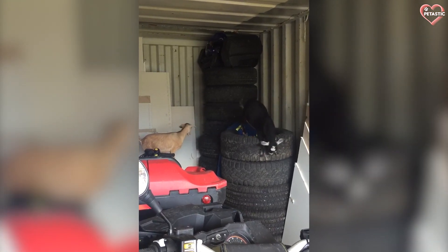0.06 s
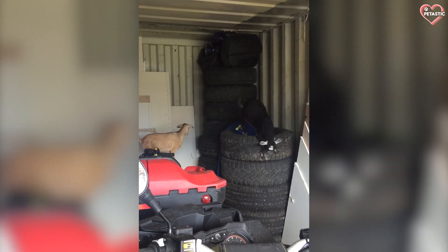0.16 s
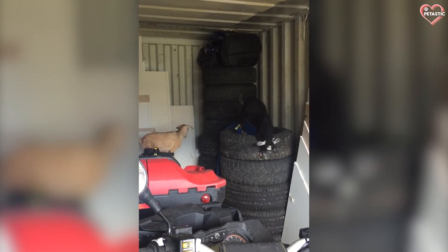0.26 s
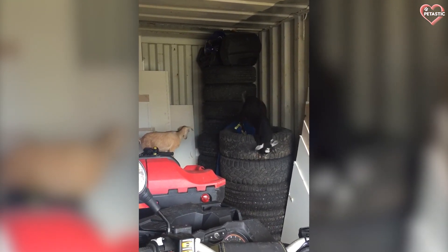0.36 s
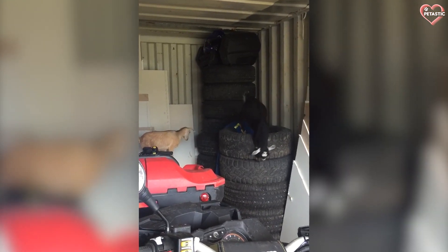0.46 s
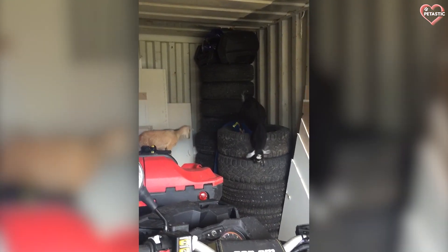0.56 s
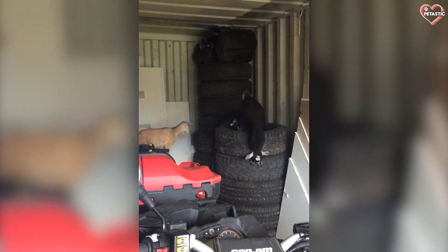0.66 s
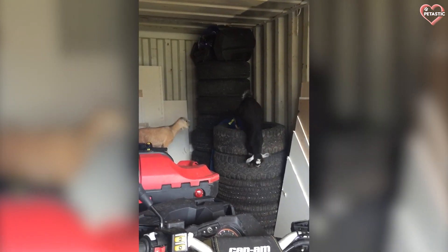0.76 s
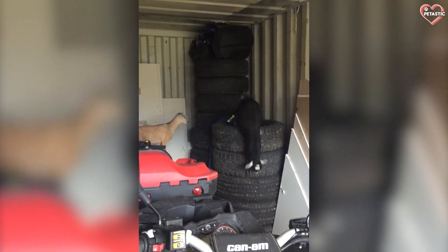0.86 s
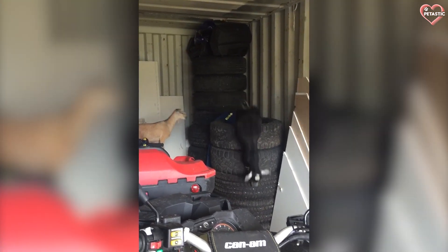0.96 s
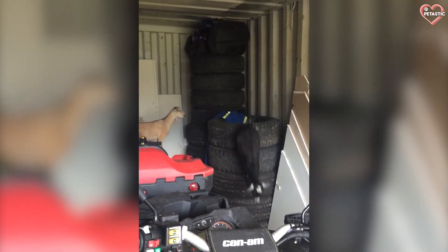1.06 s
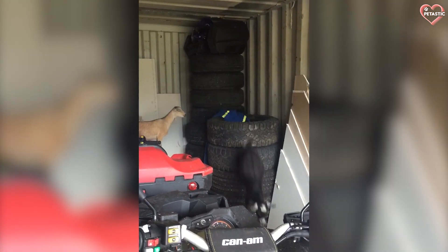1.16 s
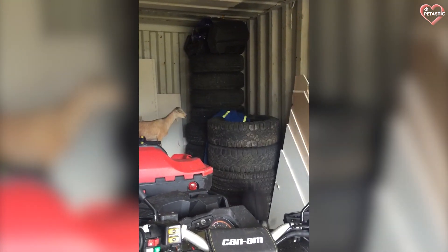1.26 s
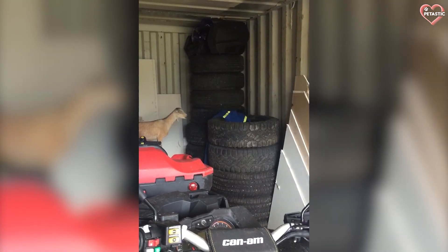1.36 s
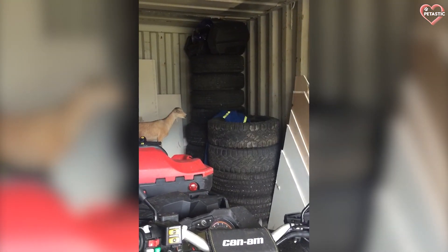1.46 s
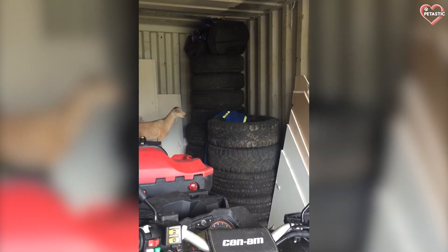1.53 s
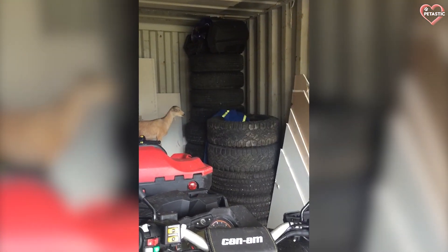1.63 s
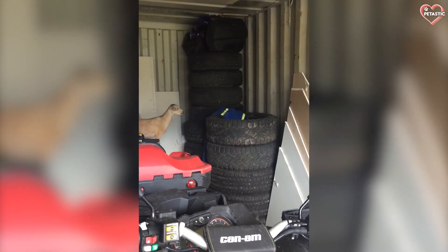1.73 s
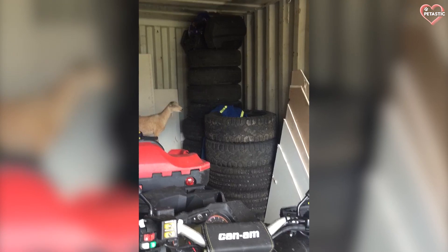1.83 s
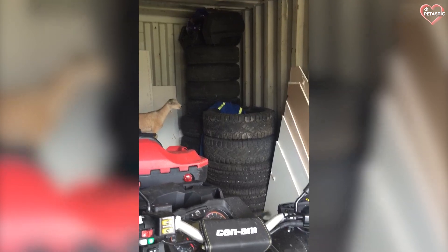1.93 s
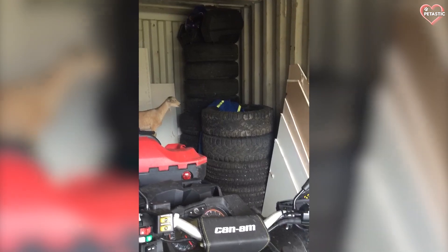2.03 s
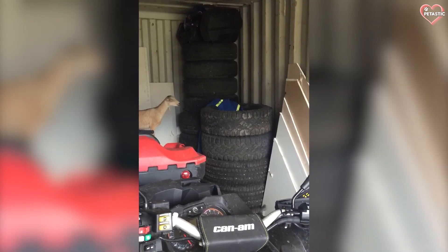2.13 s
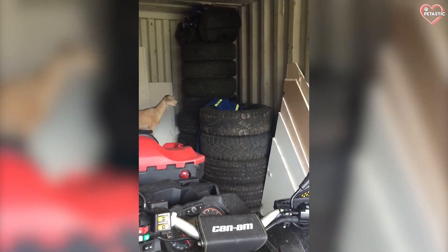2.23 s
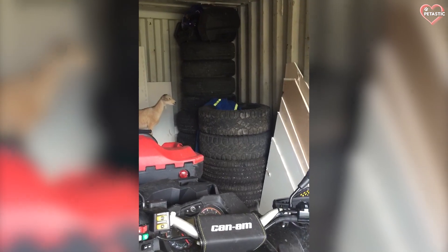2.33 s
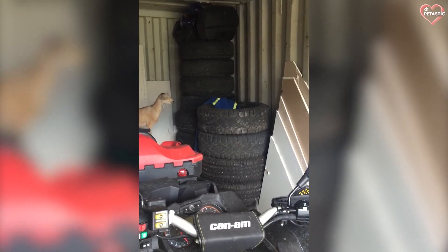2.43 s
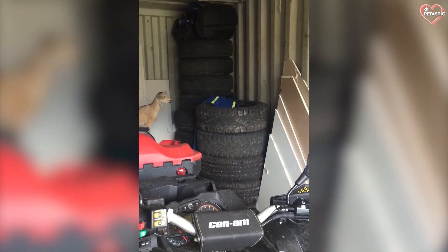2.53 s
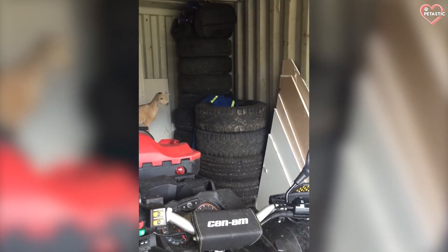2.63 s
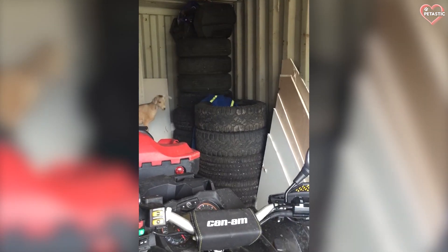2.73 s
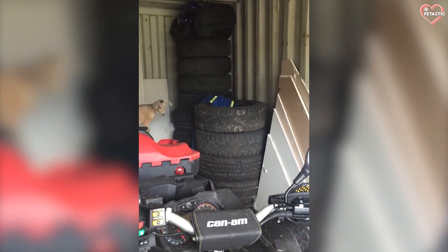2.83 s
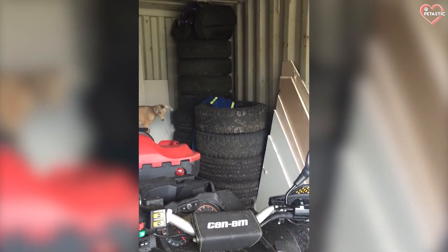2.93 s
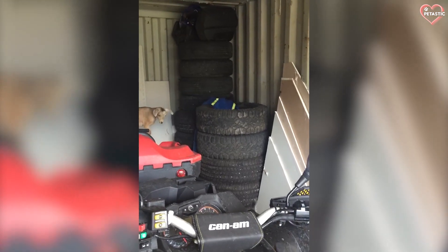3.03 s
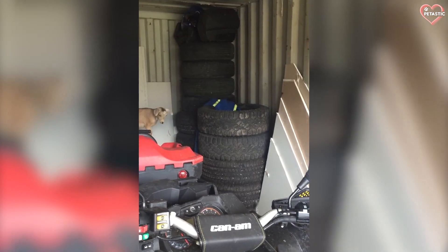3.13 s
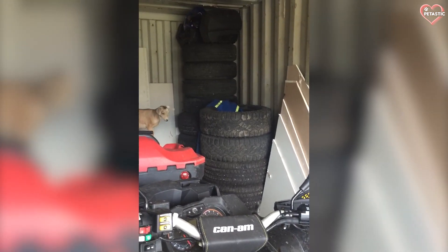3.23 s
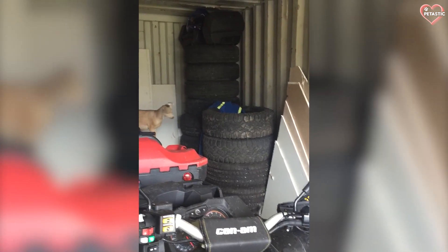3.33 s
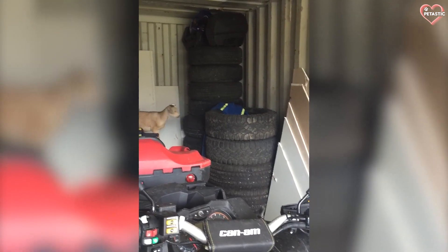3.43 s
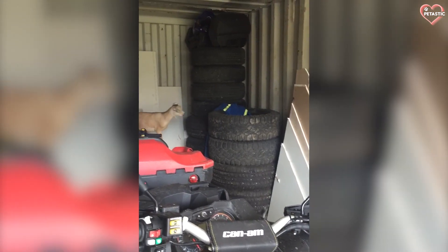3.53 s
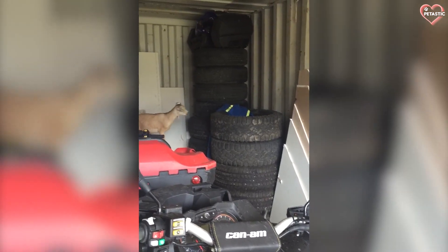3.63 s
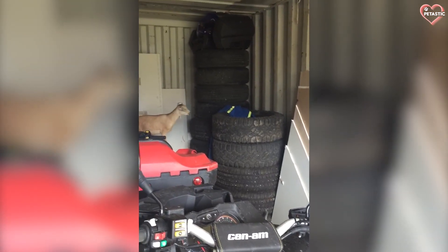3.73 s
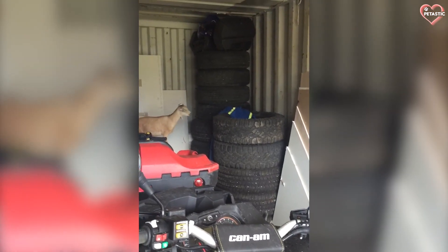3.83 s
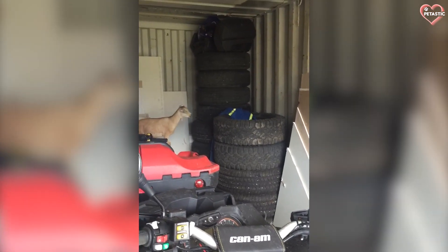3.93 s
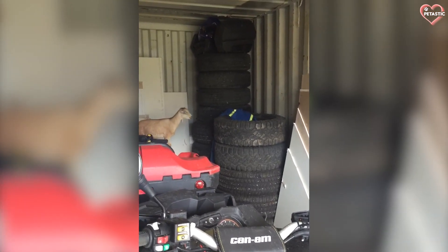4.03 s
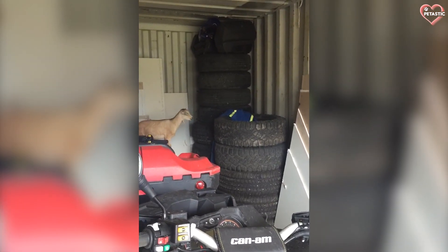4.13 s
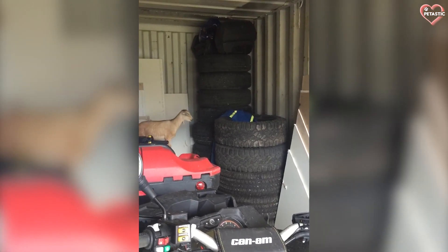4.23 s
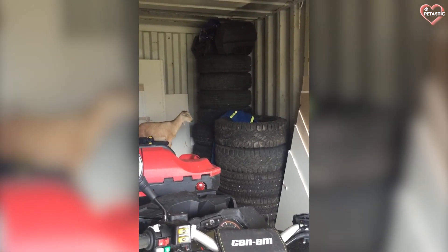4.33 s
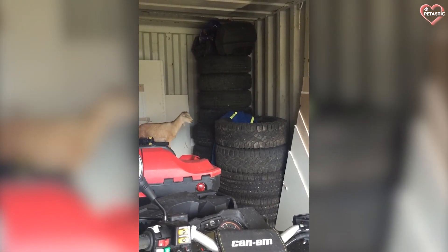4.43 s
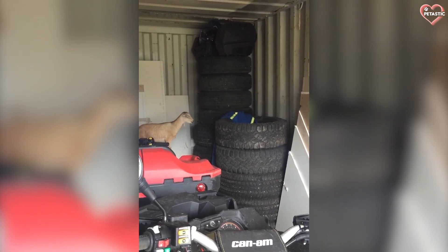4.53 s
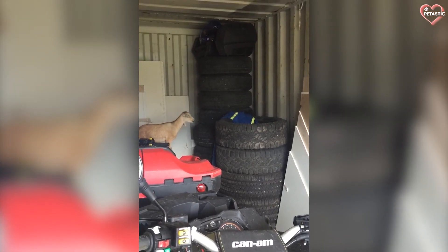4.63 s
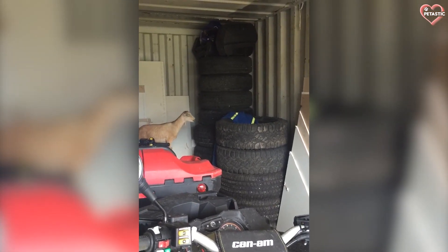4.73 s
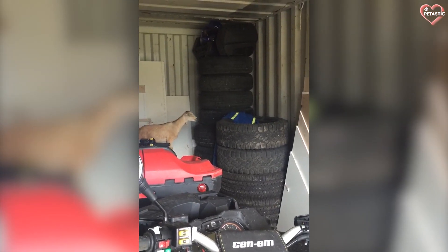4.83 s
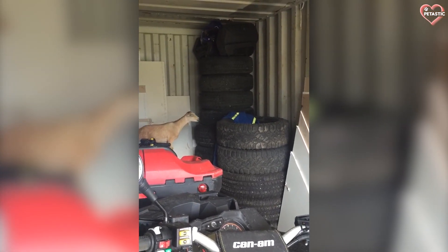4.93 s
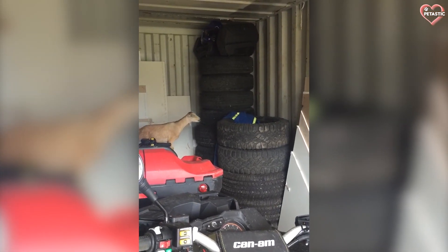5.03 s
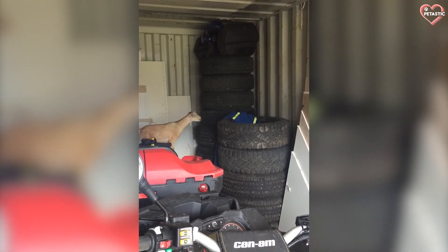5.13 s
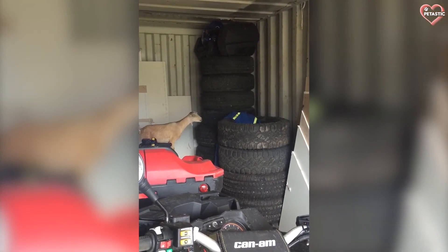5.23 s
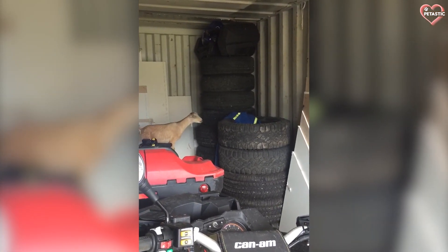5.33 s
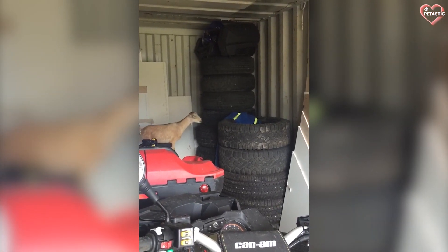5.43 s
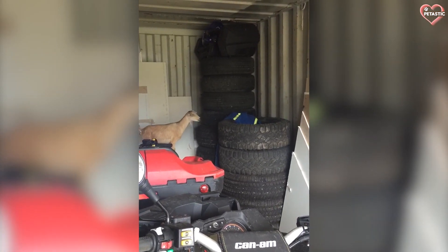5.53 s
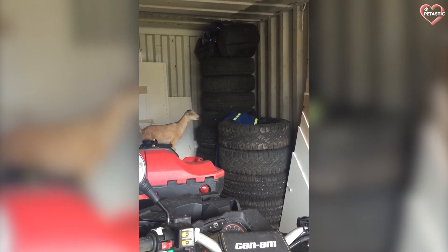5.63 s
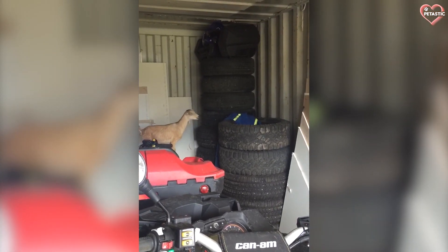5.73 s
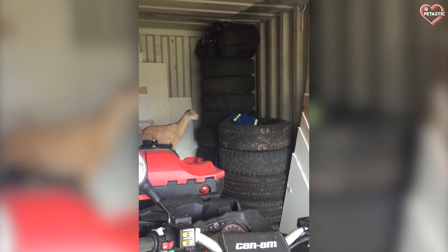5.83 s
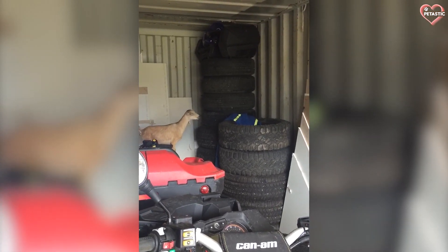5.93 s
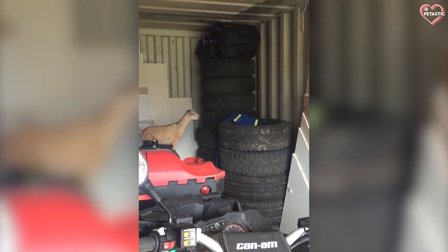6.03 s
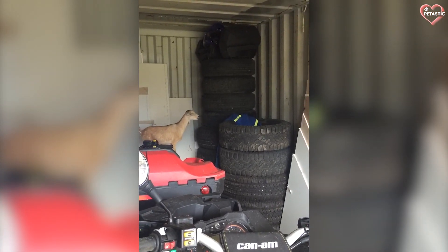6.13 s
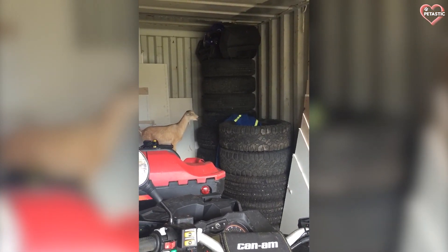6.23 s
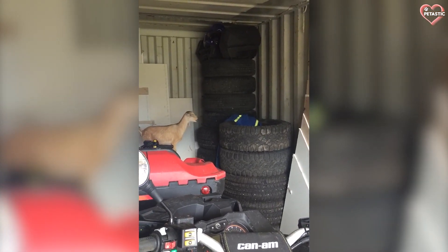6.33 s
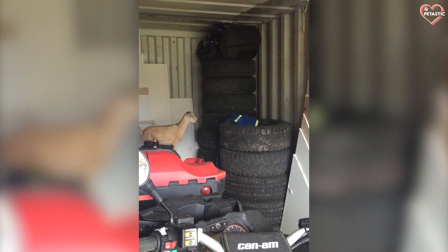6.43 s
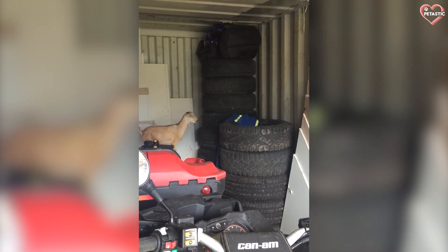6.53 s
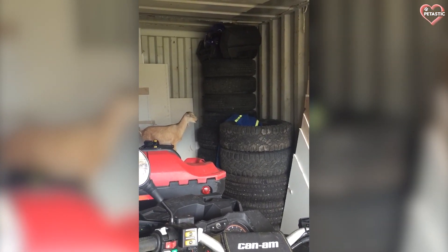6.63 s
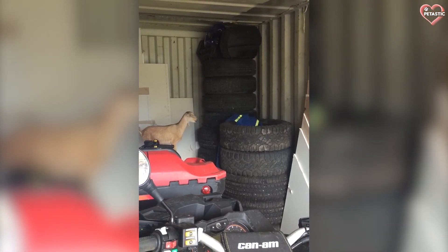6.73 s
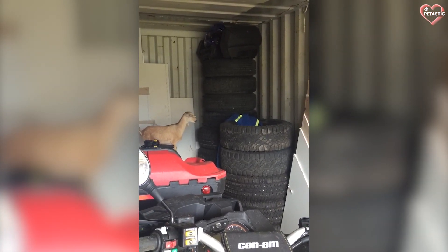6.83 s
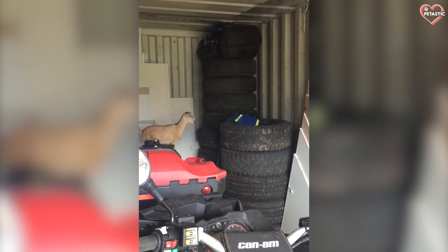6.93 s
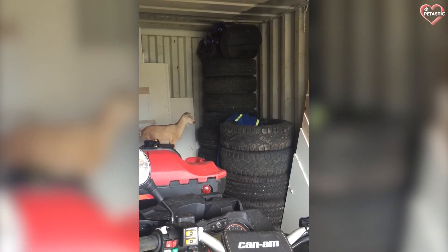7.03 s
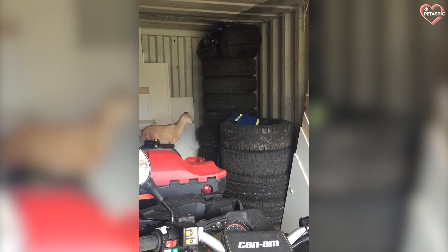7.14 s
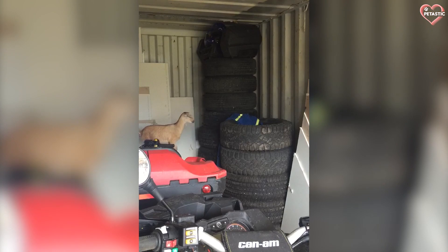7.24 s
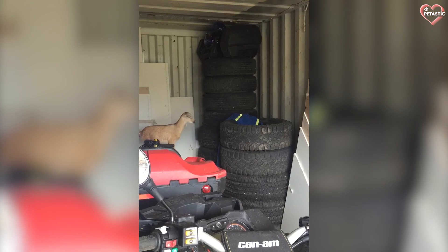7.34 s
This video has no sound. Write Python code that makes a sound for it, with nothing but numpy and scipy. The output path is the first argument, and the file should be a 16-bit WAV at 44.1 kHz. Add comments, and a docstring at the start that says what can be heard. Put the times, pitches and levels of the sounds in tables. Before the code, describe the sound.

A goat jumps off stacked tyres and lands with a loud hollow double thud, metal walls ringing, then single hoof taps.

```python
"""Hooves sound on the floor and load of a steel storage container as goats move about: bursts of noise echoes
with two narrow resonances. One goat shifts on a stack of tyres, whose air column sounds a wobbling low tone,
then jumps down with a double thud. The thud excites damped modes of walls and floor, a noise shimmer in the
thin panels and a small metal rattle; single knocks follow. Shaped noise gives a low rumble and a faint hiss."""
import sys
import numpy as np
from scipy import signal
from scipy.io import wavfile

SR = 44100
rng = np.random.default_rng(int(sys.argv[2]) if len(sys.argv) > 2 else 0)


def transcribe(signal):
    """Save signal, clipped to [-1, 1], as a 16-bit WAV file at the path in sys.argv[1]."""
    frames = np.atleast_2d(signal).T
    limited = np.clip(frames, -1, 1)
    pcm = np.round(limited * 32767).astype(np.int16)
    wavfile.write(sys.argv[1], SR, pcm)


N = 325445

# Third-octave band edges and geometric centres, f/Hz
EDGES = 24 * 2 ** np.arange(0, 9.5, 1 / 3)
CENTRES = np.sqrt(EDGES[1:] * EDGES[:-1])

# Spectrum of the hiss: f/Hz, density level/dB (per Hz, relative)
HISS_SPECTRUM = [(18, -32), (30, -4.5), (81, -4.5), (177, -7.5), (307, -6), (479, -11.5), (1080, -11.5),
                 (4900, -21.5), (5890, -22.5), (10500, -28), (12200, -31), (14300, -28.5), (15500, -42)]
HISS_DB = -70
# Level of the low rumble as tyres and floor flex under the animals' weight: t/s, level/dB
RUMBLE_LEVEL = [(0.0, -70), (0.35, -75), (0.82, -58), (1.09, -45), (1.21, -60), (1.46, -48.5), (1.58, -42),
                (2.6, -60.5), (2.9, -70.5), (3.05, -65), (4.2, -70), (4.4, -66.5), (4.93, -74),
                (5.73, -69.5), (6.7, -75), (7.38, -78.5)]
# Spectrum of the rumble: f/Hz, density level/dB (per Hz, relative)
RUMBLE_SPECTRUM = [(13, -38), (22, -5), (43, 7), (91, 5), (124, -6.5), (162, -17), (200, -18), (260, -59.5),
                   (440, -120)]

# Blows of a loose metal part after the jump: t/s, level/dB
RATTLE_BLOWS = [(1.913, -67), (1.921, -70.5), (1.955, -71.5)]
# Modes of that part: f/Hz, level/dB, nominal t60/s
RATTLE_MODES = [(1630, 7, 0.14), (2720, 0.5, 0.11), (5400, -7, 0.08), (6470, -6.5, 0.0516)]
# Blows that shake the walls: t/s, level/dB
WALL_BLOWS = [(1.392, -27), (1.446, -29)]
# Modes of the corrugated walls and floor: f/Hz, level/dB, nominal t60/s
WALL_MODES = [(37.6, -22.5, 4.2), (46.14, -26, 3.5), (58.865, -18, 3.8), (64, -15.5, 2.2), (79, 6, 0.45),
              (83, -12.5, 3.5), (102.6, -14.5, 2), (108.57, -18.5, 2), (220.5, -26, 1.8),
              (242.04, -17, 2.8), (235.1, -13, 2.337), (268.4, -11, 1.7), (301.9, -8, 3.2),
              (299.4, -9.5, 1.838), (319.5, -2, 1.723), (336.6, -14.5, 4), (348, -7.5, 2.5), (364, -8, 1.7),
              (405.1, -12, 1.7), (417.6, -0.5, 0.79), (432, -12, 1.444), (537, -7.5, 1.176),
              (593.1, -25, 1.198), (628, -15, 1.5), (700, -10, 1.3), (662, -17, 0.84), (750.6, -10, 0.3),
              (993, -19.5, 1.5), (1220, -21.5, 0.61), (1410, -23, 0.701)]
# Shimmer of the thin panels, modes too many to tell apart: f/Hz, level/dB, t60/s
PANEL_SHIMMER = [(150.6, -31, 0.5), (292, -14, 2.3), (597, -17, 1.42), (1005, -17, 0.96),
                 (1700, -16.5, 0.46), (2793, -27.5, 0.33), (5000, -36, 0.72)]

# Pushes on the hollow tyre stack: t/s of full level, time held/s, level/dB
TYRE_PUSHES = [(0.655, 0.094, -53), (0.954, .005, -53), (1.03, .045, -40)]
PUSH_RISE_DB_PER_S, PUSH_FALL_DB_PER_S, STACK_HZ = 449.5, 260, 120.4

# Colour of the steel box for the contacts: f/Hz, level/dB
BOX_RESPONSE = [(30, -15.5), (55, -4.5), (80, 0.36), (145, -3.61), (185, -12), (250, 1.68), (500, 0.09),
                (1000, -2.5), (2500, 0.17), (6000, 5), (14000, -0.5)]
# Decay of echoes between walls and cargo, before each kind's length factor: f/Hz, t60/s
ECHO_DECAY = [(40, 0.3202), (150, 0.47), (400, 0.3665), (1100, 0.414), (2900, 0.3444), (7700, 0.2457),
              (14000, 0.18)]
# Frequencies of the seven layers that describe a contact's colour: f/Hz
LAYER_FREQUENCIES = [70, 130, 300, 640, 1400, 3900, 9500]
# dB added to each of the seven layers per dB of weight (the lows), boom (mainly the middle)
# and hardness (mainly the top two)
WEIGHT_PER_LAYER = [1, 1, 0, 0, 0, 0, 0]
BOOM_PER_LAYER = [0, 0, 0.864, 0.95, 0, 0.027, 0.194]
HARDNESS_PER_LAYER = [0.0056, 0.35, 0.21, 0.0086, 0.044, 0.996, .9]
NOTE_BOOM_SHARE = 0.6107  # dB on the hollow note per dB of boom

# Kinds of contact: layers_db, level/dB of the seven layers; length, factor on the echo t60; build_ms, build-up/ms;
# crack_db, early burst/dB; low_db and high_db, level/dB of the hollow and upper notes
HARD_KNOCK = dict(layers_db=[-15, -10, -15, -10.5, -8.5, -18.5, -41],
              length=1.035, build_ms=5.32, crack_db=-9.5, low_db=-12.5, high_db=-19)
SOFT_TREAD = dict(layers_db=[-13, 3.5, -13, -22.5, -23, -29.5, -27.5],
              length=1.196, build_ms=4.8, crack_db=-13, low_db=-13, high_db=-25.5)
LANDING_THUD = dict(layers_db=[-24.5, -48, -9, -10, -16.5, -29.5, -40],
                length=1.019, build_ms=3.2, crack_db=-4, low_db=-13, high_db=-22)
SLIDING_SCUFF = dict(layers_db=[-14.5, -10, -14, -17.5, -12.5, -25.5, -25.5],
                 length=0.826, build_ms=16.3, crack_db=-25.5, low_db=-11.5, high_db=-21.5)

# Hard hoof knocks; the first row is the dying end of an earlier hit: t/s, level/dB, weight/dB, boom/dB,
# hardness/dB, hollow note f/Hz, upper note f/Hz, echo fade-out/s, prominence of the upper note/dB,
# prominence of the hollow note/dB
KNOCK_EVENTS = [(0.003, -58.5, 19.5, 13.5, 4.5, 484, 1280, 0.29, -4, 1.55),
                (0.4, -24, -19.5, -12.5, 3, 592.7, 1220, 0.54, -2, -3.5),
                (3.168, -52, 10, 1, 3, 546, 1036, 0.052, 1, 4.5),
                (3.644, -39, -2, 2.5, -12, 327, 914, 0.0823, -1.6, 2),
                (4.119, -31.5, -3.5, -5.5, -9.5, 665, 1115, 0.149, 0.5, -6),
                (4.52, -30, 1.5, -2.5, -4, 630.4, 965.4, 0.179, 5, -0.14),
                (5.73, -26.5, -6, -3.5, 4.5, 430.6, 1374, 0.177, 6, 4),
                (6.428, -31.5, -2.5, 2.5, 0.5, 396.3, 1090, 0.138, -10, -4.5),
                (7.026, -32, -0.5, -1.2, -5, 575.5, 1020, 0.1218, -3, 2),
                (7.289, -56.5, 3.5, 8.5, 2.5, 566, 895, .14, 2.47, 0.35)]
# Soft treads on rubber and cargo: t/s, level/dB, weight/dB, boom/dB, hardness/dB
TREAD_EVENTS = [(0.635, -44, -3.98, 0.4, -2.4), (0.719, -51, -14, -15, 8), (0.939, -35.5, -21.5, -15, -8),
                (1.003, -26, -1, 4.27, -17.5), (1.018, -33, -1.5, 7.5, -10),
                (1.199, -50.5, -1.5, 1.22, 5.5), (2.906, -56, -2.5, 0.3, -2.3), (3.099, -65, -4, -2, 20),
                (3.886, -59.5, 0, -8, -2.47), (3.919, -63, -2.5, -5, 0.3)]
TREAD_LOW_HZ, TREAD_HIGH_HZ, TREAD_FADE_S = 126.95, 959, 0.36
# Fore and hind hooves land on the floor, then stumble: t/s, level/dB, weight/dB, boom/dB, hardness/dB
THUD_EVENTS = [(1.39, -14.5, -10, 9.5, 2.5), (1.442, -4, -12.5, -8, 2), (1.621, -24.5, 4.5, -8, -8),
               (1.791, -33, 9.5, 1.5, -10.5), (1.914, -39, 19.5, 9.5, 2.9)]
THUD_LOW_HZ, THUD_HIGH_HZ, THUD_FADE_S = 386.95, 730.8, 0.37
# Sliding hooves that swell in softly: t/s, level/dB, weight/dB, boom/dB, hardness/dB,
# hollow note f/Hz, upper note f/Hz, echo fade-out/s
SCUFF_EVENTS = [(0.584, -36, 2, -18, 3.93, 375.5, 1238, 0.19),
                (0.884, -41, 3.5, -16.5, 6.5, 225, 980, 0.17), (2.037, -45, 13, 19, -6.53, 331, 808, 0.21),
                (2.179, -41, 0, 6, -3, 304, 767, .16), (2.243, -37, 3.22, 11, -22, 330, 930, 0.12),
                (2.275, -46.5, -9, 9.5, -16.5, 570, 900, 0.08),
                (3.508, -50.5, -3.12, -6.5, 5.5, 590, 1580, .12),
                (3.614, -36, -20, -13.5, -15, 649, 1084, 0.104),
                (3.688, -46, -2.9, 1, -12.5, 307.8, 857, 0.055),
                (4.195, -37.5, 3.5, -0.5, -14.5, 259.6, 996, 0.0506),
                (4.386, -48, -1, 1.33, -4, 645, 900, 0.058),
                (5.604, -46.5, -9.5, -5.5, -4.5, 229, 1244, 0.113)]

MIC_LOW_HZ, CUTOFF_HZ = 39, 16100


def from_db(db):
    """Decibel law: the amplitude ratio of a level in dB."""
    return 10 ** (np.asarray(db) / 20)


def rms_one(x):
    """Normalisation: a signal scaled to unit rms."""
    return x / np.sqrt(np.mean(x ** 2) + 1e-20)


def at_hz(points, hz, column=1):
    """Linear interpolation of a table column on a logarithmic frequency axis."""
    points = np.array(points)
    return np.interp(np.log(hz), np.log(points[:, 0]), points[:, column])


def drift(rate):
    """Low-pass random process: white noise through a double real pole at rate Hz, rms 1."""
    step = 40  # samples between control values
    r = np.exp(-2 * np.pi * rate * step / SR)
    noise = rng.standard_normal(N // step + 2002)
    slow = rms_one(signal.lfilter([1], [1, -2 * r, r * r], noise)[2000:])
    return np.interp(np.arange(N) / step, np.arange(len(slow)), slow)


def bands(spiky_db):
    """Band-pass analysis: third-octave noises of rms 1, from white noise with random gain per sample."""
    spikes = np.minimum(rng.exponential(1, (2, N)), 4)
    white = rng.standard_normal((2, N)) * from_db(spiky_db * spikes)
    filtered = []
    for k, (low, high) in enumerate(zip(EDGES, EDGES[1:])):
        band_pass = signal.butter(2, [low, high], "band", fs=SR, output="sos")
        filtered.append(rms_one(signal.sosfilt(band_pass, white[k % 2])))
    return filtered


def steady_noise(spectrum, patchy_db):
    """Spectral synthesis: weighted noise bands whose levels fluctuate independently, rms 1."""
    # power in a band grows with its width, hence with its centre frequency
    band_db = at_hz(spectrum, CENTRES) + 10 * np.log10(CENTRES)
    noise = np.zeros(N)
    for db, band in zip(band_db, bands(spiky_db=-1.5)):
        noise += from_db(db + patchy_db * drift(10.0)) * band
    return rms_one(noise)


def hiss():
    """Stationary broadband noise: a fixed spectrum with slight flicker in each band."""
    return from_db(HISS_DB) * steady_noise(HISS_SPECTRUM, patchy_db=0.43)


def rumble():
    """Amplitude modulation: lumpy low noise follows the shifting weight."""
    s, db = np.transpose(RUMBLE_LEVEL)
    level = from_db(np.interp(np.arange(N) / SR, s, db))
    spectrum = RUMBLE_SPECTRUM + [(400, -68.5)]  # held above 400 Hz
    return level * steady_noise(spectrum, patchy_db=3.5)


def struck(blows, modes, twins, spread):
    """Modal superposition: each blow excites damped oscillators, whose detuned twins beat."""
    times, blows_db = np.transpose(blows)
    at = np.array([round(s * SR) for s in times])
    first, out = at[0], np.zeros(N)
    for hz, level_db, t60 in modes:
        span = min(N - first, round((1.2 * t60 + times[-1] - times[0]) * SR))
        for twin in range(twins):
            gains = from_db(blows_db + level_db + rng.normal(0, 1.0, len(at)))
            clicks = np.full(span, 1e-18)  # tiny offset keeps the filter state off zero
            clicks[at - first] = gains * rng.choice([-1, 1], len(at))
            r = from_db(-60 / (t60 * rng.uniform(.7, 1.31) * SR))
            w = 2 * np.pi * hz * (1 + spread * rng.uniform(-0.91, 1)) / SR
            out[first:first + span] += signal.lfilter([0, np.sin(w)], [1, -2 * r * np.cos(w), r * r], clicks)
    return out


def rattle():
    """Impulse excitation: a loose metal part rings in four briefly damped modes."""
    return struck(RATTLE_BLOWS, RATTLE_MODES, twins=3, spread=0.0125)


def walls():
    """Modal density: low modes stand alone, high ones crowd and waver; both are faded at set times."""
    low = [mode for mode in WALL_MODES if mode[0] < 150]
    high = [mode for mode in WALL_MODES if mode[0] >= 150]
    crowd = np.zeros(N)
    for k in range(3):  # three groups waver independently
        waver = from_db(2.5 * drift(12.0))
        crowd += waver * struck(WALL_BLOWS, high[k::3], twins=5, spread=.05)
    since = np.maximum(np.arange(N) / SR - WALL_BLOWS[0][0], 0)
    low_fade = 0.41 + .7 / (1 + (since / 1.96) ** 9.0)  # steps down, not to silence
    high_fade = 1 / (1 + (since / 1.465) ** 5.3)
    lows = struck(WALL_BLOWS, low, twins=1, spread=0.0017)
    return lows * low_fade + from_db(-9.0) * crowd * high_fade


def tyres():
    """Air-column resonance: one frequency-modulated tone wobbles as the rubber flexes; pushes swell and fade."""
    t = np.arange(N) / SR
    level = np.zeros(N)
    for s, held, db in TYRE_PUSHES:
        rise_db = PUSH_RISE_DB_PER_S * np.maximum(s - t, 0)
        fall_db = PUSH_FALL_DB_PER_S * np.maximum(t - s - held, 0)
        level += from_db(db - rise_db - fall_db)
    hz = STACK_HZ * (1 + 0.063 * drift(6.5))
    phase = 2 * np.pi * np.cumsum(hz) / SR
    return level * np.sqrt(2) * np.sin(phase)


def envelope(s, level_db, t60, build_s, fade_s, burst_db):
    """Shaped decay: an early burst, then echoes that build up, decay exponentially and fade out at a set time."""
    start = max(round(s * SR), 0)
    length_s = min(1.4 * np.max(t60), 3.6 * fade_s)
    t = np.arange(min(round(length_s * SR), N - start)) / SR
    build_up = (1 - np.exp(-t / build_s)) ** 2
    echoes = build_up * from_db(-60 * t / t60) / (1 + (t / fade_s) ** 6.5)
    burst = from_db(burst_db) * t / build_s * np.exp(1 - t / build_s)  # peaks at the build-up time
    return start, from_db(level_db) * (echoes + burst)


def add_power(power, s, level_db, t60, build_ms, fade_s, burst_db):
    """Energy addition: the squared envelope of a blow joins each band; lows build up later."""
    build_s = build_ms / 1000 + np.minimum(0.028 * (80 / CENTRES) ** 2, .05)
    start, shape = envelope(s, level_db[:, None], t60[:, None], build_s[:, None], fade_s, burst_db)
    power[:, start:start + shape.shape[1]] += shape ** 2


def add_shimmer(power):
    """Statistical energy: panel modes too dense to resolve decay as noise after each wall blow."""
    outside = (CENTRES < PANEL_SHIMMER[0][0] / 2 ** .5) | (CENTRES > PANEL_SHIMMER[-1][0] * 2)
    colour_db = at_hz(PANEL_SHIMMER, CENTRES) - 40 * outside
    t60 = at_hz(PANEL_SHIMMER, CENTRES, column=2)
    for s, strength_db in WALL_BLOWS:
        add_power(power, s, strength_db + colour_db, t60, build_ms=12.0, fade_s=1.4, burst_db=-40)


def hollow_note(hz, width_share, size):
    """Resonant filtering: noise twice through one resonance, like a cluster of close modes; rms 1."""
    r, w = np.exp(-np.pi * width_share * hz / SR), 2 * np.pi * hz / SR
    noise = rng.standard_normal(size + SR // 10)  # the extra lead-in is cut off below
    for _ in range(2):
        noise = signal.lfilter([1, 0, -1], [1, -2 * r * np.cos(w), r * r], noise)
    return rms_one(noise[-size:])


def contacts():
    """Source inventory: every contact as a kind and a full row, shared notes and zero prominence filled in."""
    tread_notes = (TREAD_LOW_HZ, TREAD_HIGH_HZ, TREAD_FADE_S, 0, 0)
    thud_notes = (THUD_LOW_HZ, THUD_HIGH_HZ, THUD_FADE_S, 0, 0)
    return ([(HARD_KNOCK, row) for row in KNOCK_EVENTS]
            + [(SOFT_TREAD, row + tread_notes) for row in TREAD_EVENTS]
            + [(LANDING_THUD, row + thud_notes) for row in THUD_EVENTS]
            + [(SLIDING_SCUFF, row + (0, 0)) for row in SCUFF_EVENTS])


def hooves():
    """Impact excitation: each contact is a coloured swarm of echoes with two notes; panel shimmer joins it."""
    power, notes = np.zeros((len(CENTRES), N)), np.zeros(N)
    shares = [WEIGHT_PER_LAYER, BOOM_PER_LAYER, HARDNESS_PER_LAYER]
    for kind, row in contacts():
        s, peak_db, weight_db, boom_db, hard_db, low_hz, high_hz, fade_s, upper_db, hollow_db = row
        onset = s - .003  # tabulated times lie 3 ms after the onset
        build_ms, length, burst_db = max(kind["build_ms"], .5), kind["length"], kind["crack_db"]
        layers_db = kind["layers_db"] + np.dot([weight_db, boom_db, hard_db], shares)
        layer_points = list(zip(LAYER_FREQUENCIES, layers_db))
        colour_db = at_hz(layer_points, CENTRES) + at_hz(BOX_RESPONSE, CENTRES)
        t60 = length * at_hz(ECHO_DECAY, CENTRES)
        add_power(power, onset, peak_db - 9.5 + colour_db, t60, build_ms, fade_s, burst_db)

        low_db = kind["low_db"] + hollow_db + NOTE_BOOM_SHARE * boom_db
        high_db = kind["high_db"] + upper_db
        for hz, db in [(low_hz, low_db), (high_hz, high_db)]:
            note_t60 = 0.811 * length * at_hz(ECHO_DECAY, hz)
            start, shape = envelope(onset, peak_db + db, note_t60, build_ms / 1000, fade_s, burst_db)
            note = hollow_note(hz, width_share=.2, size=len(shape))
            notes[start:start + len(shape)] += shape * note
    add_shimmer(power)
    echoes = sum(np.sqrt(p) * band for p, band in zip(power, bands(spiky_db=4.0)))
    return notes + echoes


def scene():
    """Linear superposition: all sources add at one microphone."""
    return (hiss() + rumble() + rattle() + walls() + tyres() + hooves())[None]


def record(dry):
    """Band limitation: the microphone drops the deepest bass and the top is cut steeply."""
    high_pass = signal.butter(6, MIC_LOW_HZ, "high", fs=SR, output="sos")
    low_pass = signal.cheby2(12, 60, CUTOFF_HZ, fs=SR, output="sos")
    return signal.sosfilt(low_pass, signal.sosfilt(high_pass, dry))


dry = scene()
out = record(dry)
transcribe(out)
```